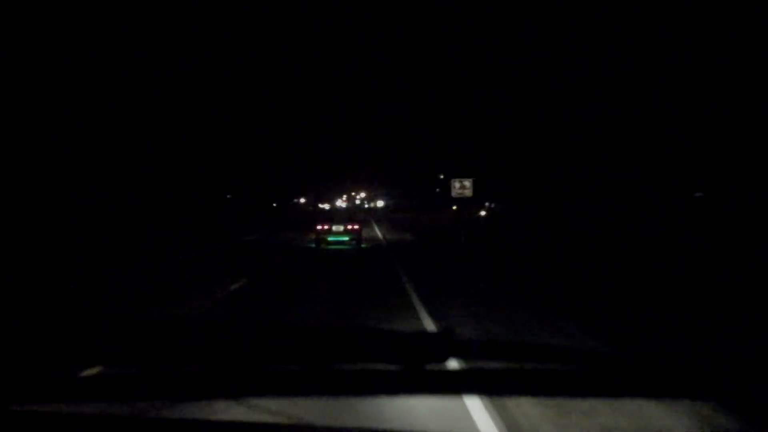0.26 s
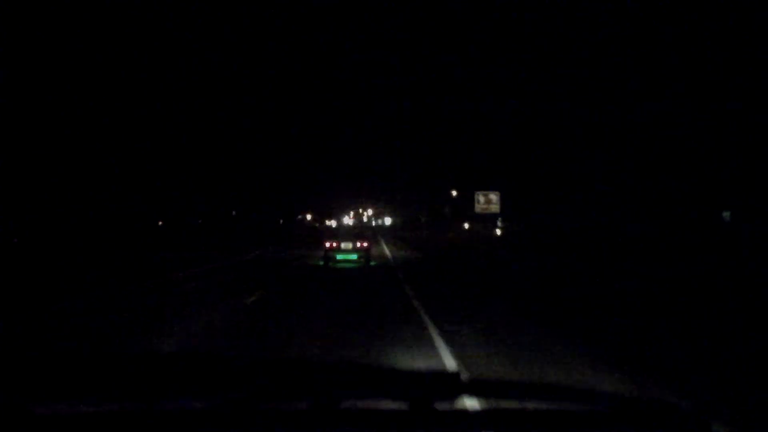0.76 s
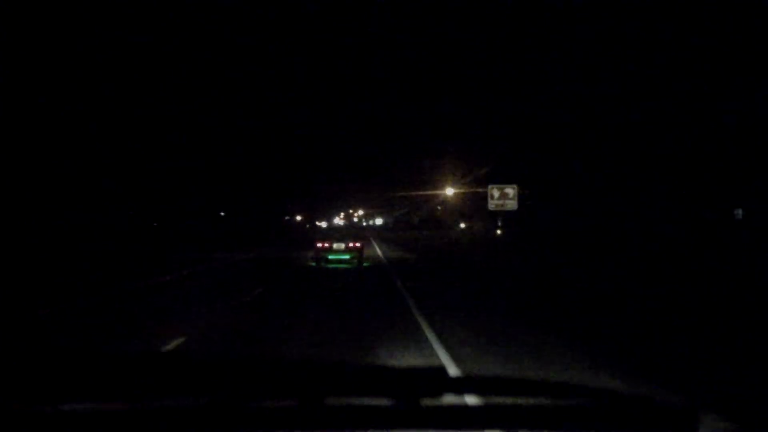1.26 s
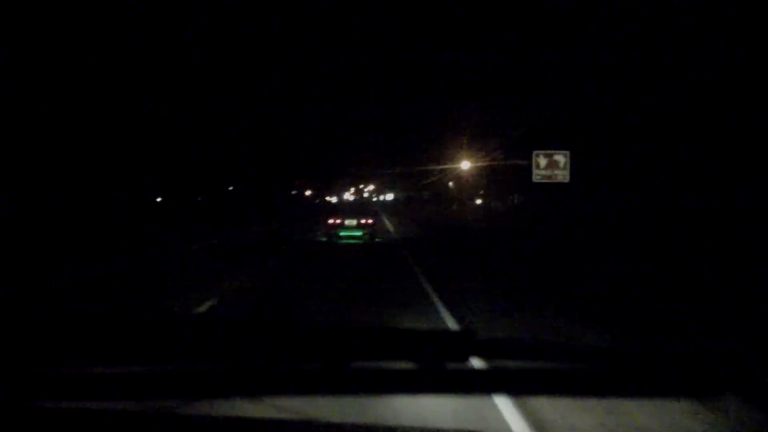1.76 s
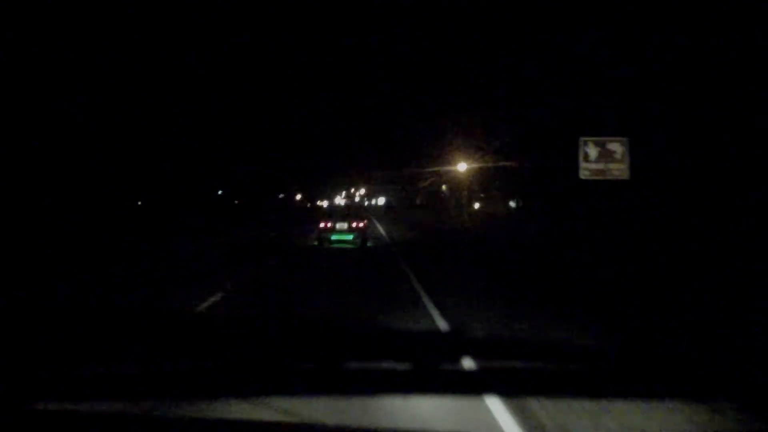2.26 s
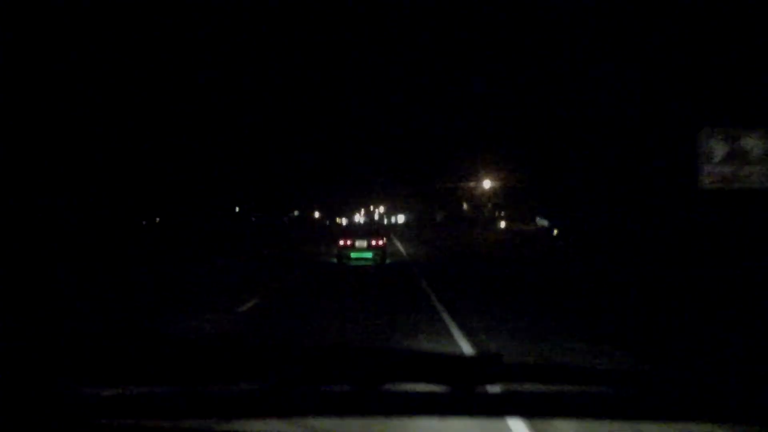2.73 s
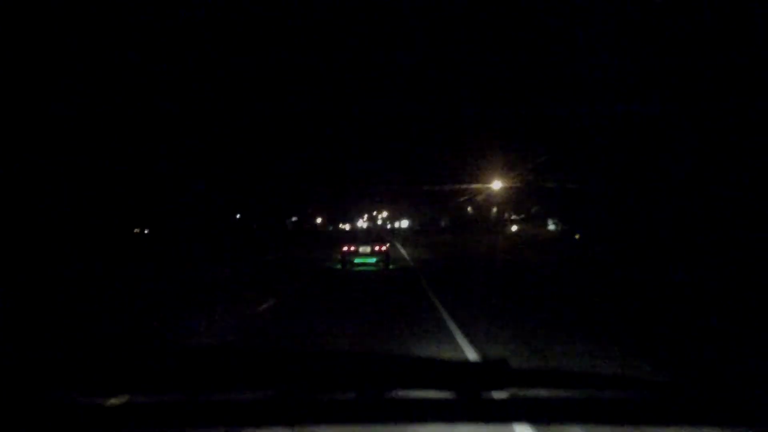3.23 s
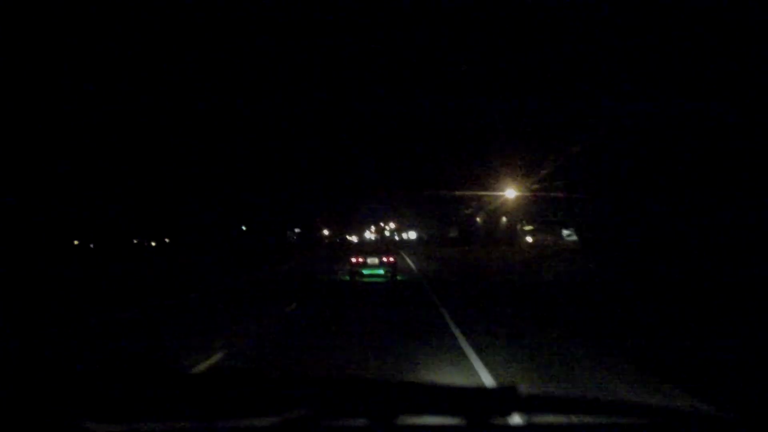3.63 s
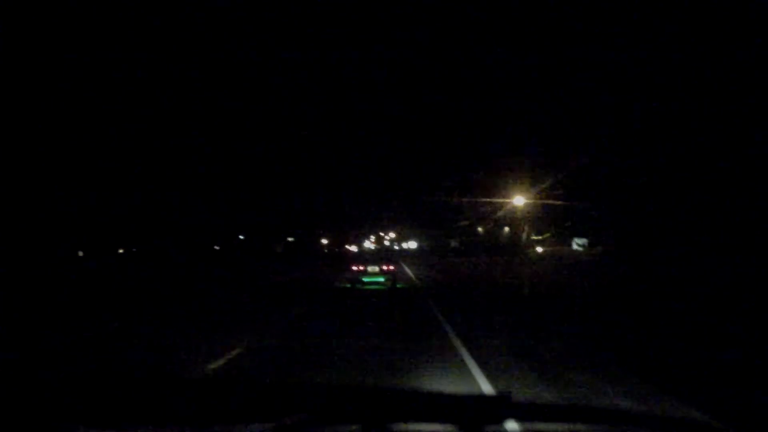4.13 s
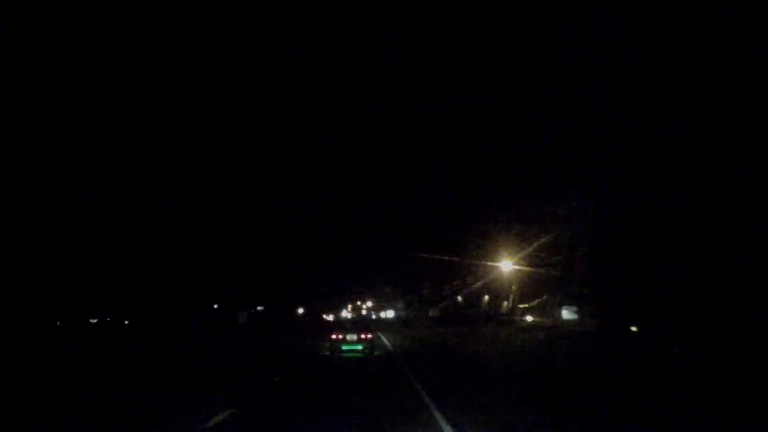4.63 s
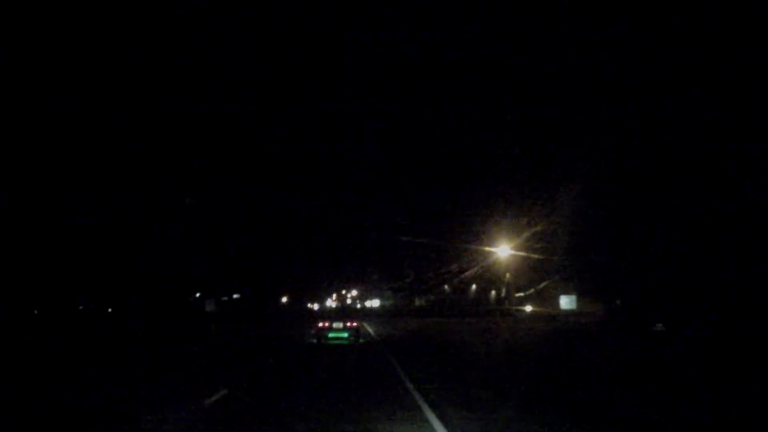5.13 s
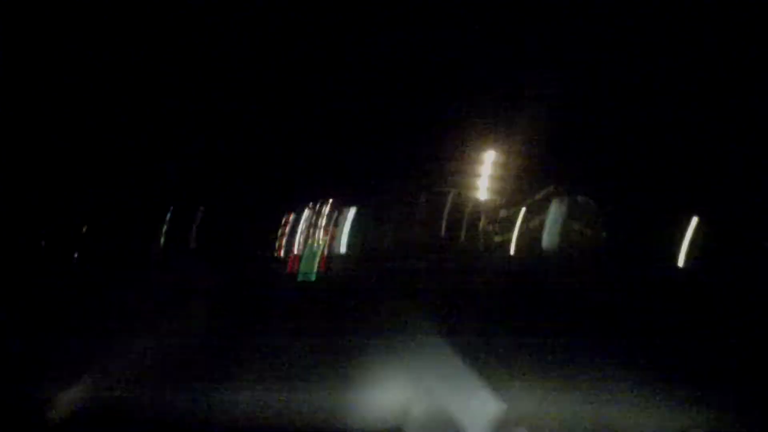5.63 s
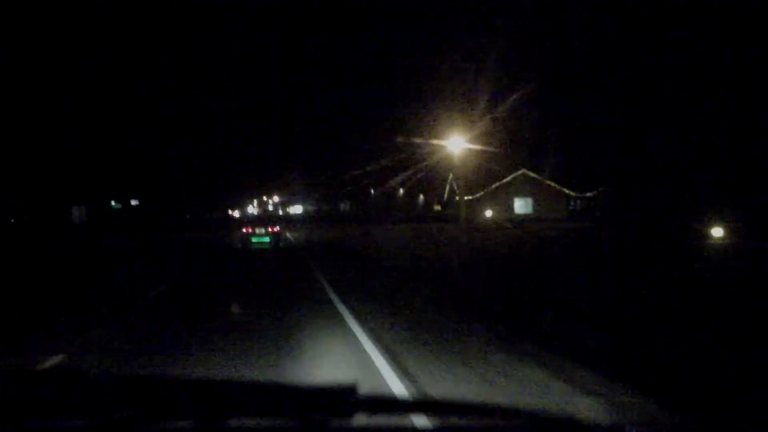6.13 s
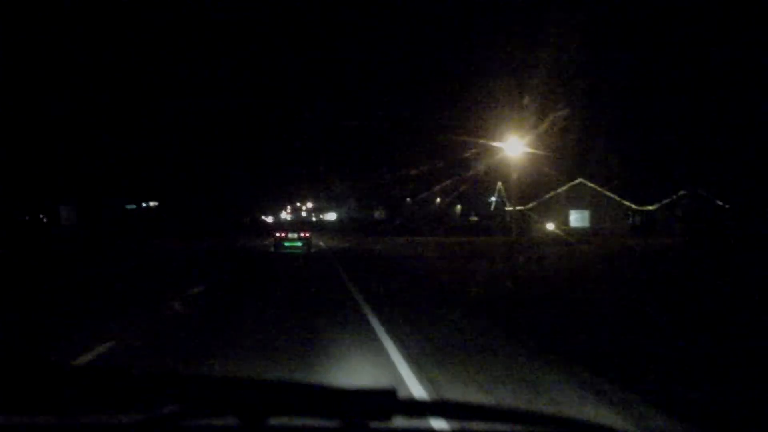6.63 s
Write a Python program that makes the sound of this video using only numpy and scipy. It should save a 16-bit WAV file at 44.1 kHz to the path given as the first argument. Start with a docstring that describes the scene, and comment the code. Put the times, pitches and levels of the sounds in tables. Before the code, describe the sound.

Car cabin interior: lumpy engine hum booms over tyre rumble, rises, lurches with a heavy thud, then growls hard and steady under acceleration.

```python
"""An engine with an uneven firing pattern, heard inside a car, coasts, holds and pulls, booming in the cabin.
Its tone is a sum of orders (multiples of the pattern rate); after a jolt it pulls hard with a coarser, louder
beat under a wide, throbbing roar. The jolt is a set of decaying sines, with a thin sine squeak soon after.
Loose trim ticks as enveloped noise; tyre roar and body rumble are shaped noise.
Two close microphone ports overload softly."""
import sys
import numpy as np
from scipy import signal
from scipy.fft import rfft, irfft, next_fast_len
from scipy.io import wavfile
from scipy.ndimage import uniform_filter1d

SR = 44100
rng = np.random.default_rng(int(sys.argv[2]) if len(sys.argv) > 2 else 0)


def generate_wav(sig):
    """Save sig (samples, or channels by samples) to the path in sys.argv[1] as 16-bit PCM at SR."""
    pcm = np.round(np.clip(np.atleast_2d(sig).T, -1, 1) * 32767).astype(np.int16)
    wavfile.write(sys.argv[1], SR, pcm)


N = 303849
T = np.arange(N) / SR
LEFT_LAG_S = 2.0e-5  # extra travel time to the left port


def amp(db):
    """Decibel law: 20 dB is a factor of ten in amplitude."""
    return 10 ** (np.asarray(db) / 20)


def evened(x):
    """Normalisation to unit rms."""
    return x / np.sqrt(np.mean(x ** 2) + 1e-20)


def read_spectrum(points, hz):
    """Interpolation of a spectrum along a logarithmic frequency axis."""
    f, value = np.transpose(points)
    return np.interp(np.log(hz + 1), np.log(f + 1), value)


def columns(rows, t):
    """Linear interpolation of each column of a curve table at times t."""
    s, *values = np.transpose(rows)
    return [np.interp(t, s, v) for v in values]


def wander(t, hz):
    """Low-passed chance: noise through a one-pole filter with decay rate 2 pi hz, about rms 1."""
    knot_rate = 200  # Hz
    knots = np.arange(0, t[-1] - t[0] + 1, 1 / knot_rate)
    pole = np.exp(-2 * np.pi * hz / knot_rate)
    smooth = signal.lfilter([1], [1, -pole], rng.standard_normal(len(knots)))
    return np.interp(t - t[0], knots, evened(smooth))


def order(t, turns, k, db, rough, spread=1.0):
    """Harmonic of a rotating source: k periods per turn, with wavering strength and phase."""
    shake = rough * (wander(t, hz=6.0) + 1j * wander(t, hz=6.0))
    # starting phase drawn within spread (in periods); a small spread gives sharper pulses
    phase = 2 * np.pi * (k * turns + spread * rng.random())
    return -np.sqrt(2) * amp(db) * ((1 + shake) * np.exp(1j * phase)).real


# coherence of diffuse sound at the two ports: pitch_hz [Hz], likeness [0-1]
PORT_LIKENESS = [(60, 1), (1340, 1), (2900, 1), (6310, 0.87), (13700, 0.26)]


def hiss(shape, size, patchy_db, bands=()):
    """Diffuse noise: random short-time spectra with drifting patches, rms 1, alike at both ports in the bass."""
    frames, hz = 4 * N // size + 5, np.fft.rfftfreq(size, 1 / SR)
    a, b, c, d, patches = rng.standard_normal((frames, len(hz), 5)).T
    across_hz = uniform_filter1d(patches, size=9, axis=0)
    patches = evened(uniform_filter1d(across_hz, size=7, axis=1))
    bands_db = sum(db / (1 + (2 * (hz - f) / w) ** 2) for f, w, db in bands)
    colour_db = read_spectrum(shape, hz) + bands_db
    same = np.clip(read_spectrum(PORT_LIKENESS, hz), 0, 1)[:, None]
    lag = np.exp(-2j * np.pi * hz * LEFT_LAG_S)[:, None]
    right = a + 1j * b
    left = same * right * lag + np.sqrt(1 - same ** 2) * (c + 1j * d)
    spectra = np.array([left, right]) * amp(colour_db[:, None] + patchy_db * patches)
    return evened(signal.istft(spectra, nperseg=size, noverlap=3 * size // 4)[1][:, :N])


# engine speed before the jolt: start_s [s], pattern_hz [firing pattern repeats, Hz]
PATTERN_SPEED = [(0, 12.7), (1.8, 12.48), (2, 12.64), (2.1, 12.96), (2.45, 13.55), (2.6, 13.93),
                 (2.75, 14.1), (3, 14.22), (4.15, 14.34), (4.3, 14.44), (4.6, 15.15), (4.9, 16.24),
                 (5.2, 16.97), (5.4, 17.8), (5.6, 18.4)]
# order strengths in the cabin: order [multiple], coast_db, hold_db, climb_db, pull_db [dB]
PATTERN_ORDERS = [(1, -51, -36, -29, -47), (2, -30, -30, -35, -39), (3, -31, -23, -24, -21),
                  (4, -38, -37, -40, -30), (5, -35, -31, -30, -24), (6, -44, -25, -22, -18),
                  (7, -29, -25, -28, -29), (8, -24, -11, -16, -32), (9, -35, -33, -33, -27),
                  (10, -62, -44, -40, -44), (11, -60, -34, -33, -57), (12, -51, -39, -56, -52),
                  (13, -58, -44, -43, -44), (14, -52, -42, -42, -36), (15, -44, -34, -58, -42),
                  (16, -66, -39, -41, -37), (17, -63, -60, -49, -35), (18, -52, -44, -39, -34),
                  (19, -62, -35, -31, -36), (20, -62, -43, -61, -45), (21, -59, -44, -48, -45),
                  (22, -65, -49, -54, -50), (23, -53, -56, -54, -63), (24, -49, -49, -50, -59),
                  (25, -71, -56, -67, -81), (26, -61, -62, -65, -55), (35, -70, -75, -54, -51),
                  (36, -76, -70, -58, -55), (37, -80, -61, -59, -45), (41, -59, -53, -52, -66),
                  (42, -74, -50, -56, -60), (47, -69, -53, -67, -64)]
# cabin response to orders 6 and 8 as they slide through its boom: pitch_hz [Hz], level_db [dB]
CABIN_BOOM = [(75, -40.5), (80, -28.5), (85, -27.5), (94, -18.5), (100, -18), (107, -12), (111.5, -9),
              (115, -11), (119, -16), (125, -19), (130, -26), (133, -42), (139, -25), (147, -19.5)]
# pattern rates that mark the throttle states; the pull strengths hold at PULL_HZ
COAST_HZ, HOLD_HZ, LEAVE_HZ, CLIMB_HZ, PULL_HZ = 12.65, 13.76, 14.42, 15.06, 16.78
COAST_DB = -6  # the boom is weaker off the throttle
LIFT_DB, PUSH_DB, PUSH_HZ = 0.5, 5.5, (17.1, 17.8)  # the other orders, and their gain over the last revs


def drive():
    """Order synthesis: multiples of the firing pattern, rebalanced by the throttle and coloured by the cabin."""
    step = 8  # all of it lies low, so every eighth sample is enough
    t = T[T < PATTERN_SPEED[-1][0]][::step]
    (hz,) = columns(PATTERN_SPEED, t)
    turns = np.cumsum(hz) * step / SR
    # throttle states: 0 coast, 1 hold, 2 climb, 3 pull
    throttle = np.interp(hz, [COAST_HZ, HOLD_HZ, LEAVE_HZ, CLIMB_HZ, PULL_HZ], [0, 1, 1, 2, 3])
    lift_db = LIFT_DB + PUSH_DB * np.interp(hz, PUSH_HZ, [0, 1])
    table = np.transpose(PATTERN_ORDERS)
    out = 0
    for k, coast, hold, climb, _ in PATTERN_ORDERS:
        if k in (6, 8):
            level_db = read_spectrum(CABIN_BOOM, k * hz) + COAST_DB * np.maximum(1 - throttle, 0)
        else:
            # above PULL_HZ the orders slide through the cabin's response
            pull = np.interp(k * np.maximum(hz / PULL_HZ, 1), table[0], table[-1])
            eased = np.interp(throttle, [0, 1, 2, 3], [coast, hold, climb, 0])
            level_db = lift_db + eased + pull * np.clip(throttle - 2, 0, 1)
        out = out + order(t, turns, k, level_db, rough=0.11)
    fade = np.clip((t[-1] - t) / 0.036, 0, 1)
    out = signal.resample_poly(out * fade, step, 1)
    return np.pad(out, (0, N - len(out)))


# engine after the jolt: start_s [s], beat_hz [Hz], level_db [dB, all orders together], strain [0-1]
HARD_PULL = [(5.6, 25, -7, 0.01), (5.63, 26.73, -11, 0.16), (5.665, 28.94, -11.5, 0.04),
             (5.714, 32.23, -7.5, 0.8), (5.8, 34.16, -4, 0.57), (5.84, 35.06, -5, 0.5),
             (5.876, 34.68, -9.5, 0.45), (5.98, 33.28, -8, 0.68), (6.05, 33.28, -8, 0.66),
             (6.174, 33.95, -8.5, 0.17), (6.89, 35.19, -7.5, 0)]
# relative order strengths in the cabin: order [multiple], early_db, late_db [dB]
BEAT_ORDERS = [(1, -26, -25), (2, -16, -18), (3, -11, -10), (4, -23, -21), (5, -22, -27), (6, -27, -29),
               (7, -29, -29), (8, -22, -24), (9, -20, -22), (10, -45, -38), (11, -43, -39), (12, -35, -32),
               (13, -36, -37), (14, -38, -32), (15, -45, -36), (16, -39, -30), (17, -38, -33),
               (18, -34, -34), (19, -35, -32), (20, -39, -40), (21, -48, -53), (22, -58, -46),
               (23, -45, -44), (24, -48, -51), (25, -37, -35), (26, -47, -41), (27, -47, -48),
               (28, -63, -52), (29, -38, -38), (30, -45, -41), (31, -40, -59), (32, -43, -50),
               (33, -49, -66), (34, -54, -53), (35, -50, -40), (36, -47, -64), (37, -50, -44),
               (38, -41, -50), (39, -42, -53), (40, -53, -44), (41, -54, -58), (42, -52, -46),
               (43, -44, -47), (44, -45, -50), (45, -55, -58), (46, -62, -59)]
FULL_BEAT_HZ = 33.2  # at and above this beat the orders stop sliding through the table
RASP_DB, HOLLOW_DB = 22, -6.5  # strain lifts orders 10-11 and thins orders 8-9
BITE_S, BITE_DB, BITE_TILT_DB = 0.088, 13, 0.5  # first instants: strong orders 8-9, brighter (dB per octave)
HEAVE_DB = 7  # orders 1-2 swell until the driveline settles


def surge():
    """Order synthesis under load: strain and a loose driveline redistribute the beat; returns sound and turns."""
    t = T[T >= HARD_PULL[0][0]]
    hz, level_db, strain = columns(HARD_PULL, t)
    turns = np.cumsum(hz) / SR
    ks, early_db, late_db = np.transpose(BEAT_ORDERS)
    later = np.clip((t - 6.3) / 0.5, 0, 1)
    slide = np.minimum(hz / FULL_BEAT_HZ, 1)  # orders slide through the cabin's response at low revs
    bite = np.exp(-((t - t[0]) / BITE_S) ** 2)
    loose = np.interp(t, [5.75, 5.95], [1, 0])  # ragged until the driveline settles
    low_db = HEAVE_DB * loose * (1 - bite)
    boom_db = BITE_DB * bite + HOLLOW_DB * strain
    rasp_db = RASP_DB * strain
    dbs = []
    for k, late in zip(ks, late_db):
        cabin_db = np.interp(k * slide, ks, early_db) * (1 - later) + late * later
        tilt_db = BITE_TILT_DB * bite * np.log2(min(k, 12) / 3)
        dbs.append(cabin_db + tilt_db + low_db * (k < 3) + boom_db * (k in (8, 9))
                   + rasp_db * (k in (10, 11)))
    rough = .07 + .3 * loose
    beat = 0
    for k, db in zip(ks, dbs):
        # timing errors weigh more on the high orders
        beat = beat + order(t, turns, k, db, rough * (1 + k / 40), spread=min(k / 12, 1))
    total = np.sqrt(np.sum(amp(dbs) ** 2, axis=0))
    beat *= amp(level_db) / total * np.clip((t - t[0]) / 0.025, 0, 1)
    return np.pad(beat, (N - len(t), 0)), np.pad(turns, (N - len(t), 0))


# roar colour: pitch_hz [Hz], density_db [relative dB per Hz]
ROAR_COLOUR = [(120, -31), (200, -13), (330, -15), (650, -12.5), (900, -20), (1300, -17), (1800, -21.5),
               (2940, -26), (5000, -33.5), (6900, -38), (9100, -40), (11500, -44.5), (13000, -51.5),
               (14500, -75)]
# roar strength before wander and throb: start_s [s], level_db [dB]
ROAR_LEVEL = [(0, -47.5), (2, -47.5), (2.8, -46.2), (4.3, -46), (4.6, -44), (5.0, -41.5), (5.39, -38.5),
              (5.68, -31), (5.87, -26), (6.1, -25.5), (6.89, -25.5)]


def engine_roar(turns):
    """Amplitude modulation: broadband noise that throbs once per beat during the hard pull."""
    (level_db,) = columns(ROAR_LEVEL, T)
    throb = 1 + .22 * np.cos(2 * np.pi * turns)
    gain = amp(level_db + 0.5 * wander(T, hz=14.0)) * throb
    return gain * hiss(ROAR_COLOUR, size=1024, patchy_db=0.8)


# swings of body and panel: start_s [s], level_db [dB, before the rise], pitch_hz [Hz], t60_s [s]
JOLT_MODES = [(5.549, 10, 28, .3), (5.62, -6, 605, .12), (5.66, -8, 33, .8)]
RISE_S = .03  # the body takes a moment to swing


def jolt():
    """Damped resonance: the body heaves and a panel rings as the driveline takes up."""
    out = np.zeros(N)
    for s, db, hz, t60 in JOLT_MODES:
        after = np.maximum(T - s, 0)
        envelope = amp(db - 60 * after / t60) * (1 - np.exp(-after / RISE_S))
        out -= envelope * np.sin(2 * np.pi * hz * after)
    return out


# thin squeak: start_s [s], end_s [s], pitch_hz [Hz], level_db [peak dB]
SQUEAK_TONE = (6.145, 6.225, 8450, -44)


def squeak():
    """Pure tone: a thin squeak under a half-sine envelope, just after the loudest tick."""
    start, end, hz, db = SQUEAK_TONE
    swell = np.sin(np.pi * np.clip((T - start) / (end - start), 0, 1))
    return amp(db) * swell * np.sin(2 * np.pi * hz * T)


# trim ticks: start_s [s], level_db [dB, before the attack], dull_db [dB relative to level_db]
TRIM_TICKS = [(0.2984, -51, 1), (2.0657, -49, -8), (2.4394, -48.5, 2), (2.759, -49, 4), (3.6406, -48, -21),
              (4.1624, -51, -9), (4.5054, -47, 2), (4.7112, -46, 1), (5.1828, -29.5, -3), (5.7144, -34, -8),
              (5.7882, -34, -9), (6.1212, -12.5, -7)]
# bright rattle colour: pitch_hz [Hz], density_db [relative dB per Hz]
RATTLE_COLOUR = [(1000, -34), (2000, -8.5), (3500, -2), (5000, -1.5), (9500, -8.5), (13000, -15.5),
                 (15500, -35.5)]
# dull knock colour: pitch_hz [Hz], density_db [relative dB per Hz]
KNOCK_COLOUR = [(400, -32.5), (690, 9), (820, -1.5), (960, 1.5), (1150, -11.5), (1400, -3), (2200, -19),
                (4000, -25.5), (9000, -70.5)]
TICK_T60_S = 0.061


def ticks():
    """Impact noise: loose trim gives a short bright rattle, with a duller knock just behind it."""
    bright, dull = np.zeros((2, N))
    for s, db, dull_db in TRIM_TICKS:
        after = np.maximum(T - s, 0)
        bright += amp(db - 60 * after / TICK_T60_S) * (1 - np.exp(-after / .0012))
        late = after / .009  # the knock peaks 9 ms after the start
        dull += amp(db + dull_db) * late * np.exp(1 - late)
    rattle = bright * hiss(RATTLE_COLOUR, size=512, patchy_db=0.5)
    knock = dull * hiss(KNOCK_COLOUR, size=1024, patchy_db=0.0)
    return rattle + knock


# tyre roar colour: pitch_hz [Hz], density_db [relative dB per Hz]
TYRE_COLOUR = [(70, -31.5), (120, -17.5), (140, -14.5), (190, -6), (256, -20), (300, -13.5), (350, -19.5),
               (515, -20), (720, -22), (1340, -26), (1650, -39), (3000, -59), (6000, -67.5), (14000, -94.5)]
# narrow bands coloured by the panels: pitch_hz [Hz], width_hz [Hz], change_db [dB]
PANEL_BANDS = [(556, 130, 2.5), (724, 120, 4), (866, 120, 0.5), (974, 34, 6.5), (1415, 15, -7.5),
               (1600, 14, 0.5)]
# tyre roar strength: start_s [s], level_db [dB]
TYRE_LEVEL = [(0, -37.5), (1.5, -38.5), (4.3, -37), (5.0, -34.5), (5.4, -32), (5.65, -28), (5.85, -31),
              (6.0, -36), (6.89, -36)]


def tyre_roar():
    """Spectral colouring: broadband tyre noise raised or lowered in narrow bands by the panels."""
    (level_db,) = columns(TYRE_LEVEL, T)
    return amp(level_db) * hiss(TYRE_COLOUR, size=2048, patchy_db=1.3, bands=PANEL_BANDS)


# body rumble colour: pitch_hz [Hz], density_db [relative dB per Hz]
RUMBLE_COLOUR = [(4, -9.5), (10, 3), (20, -1), (29, 0.5), (40, 3.5), (55, -13.5), (75, -10.5), (120, -17),
                 (200, -19.5), (350, -44.5), (700, -92)]
# body rumble strength before the uneven shaking: start_s [s], level_db [dB]
RUMBLE_LEVEL = [(0.0, -17.5), (0.55, -18.5), (1.35, -24), (1.9, -19.5), (2.45, -20), (4.25, -23),
                (4.7, -18.5), (5.45, -24), (5.66, -17), (5.8, -14), (6.35, -16), (6.89, -19)]
LUMPY_DB = 2.5  # the road shakes the body unevenly


def body_rumble():
    """Random excitation: low noise whose level wanders as the road shakes the body."""
    (level_db,) = columns(RUMBLE_LEVEL, T)
    gain = amp(level_db + LUMPY_DB * wander(T, hz=7.4))
    return gain * hiss(RUMBLE_COLOUR, size=8192, patchy_db=0.7)


def ports(x):
    """Arrival-time difference: a sound from one place reaches the right port slightly first."""
    size = next_fast_len(N)
    lag = np.exp(-2j * np.pi * np.fft.rfftfreq(size, 1 / SR) * LEFT_LAG_S)
    left = irfft(rfft(x, size) * lag, size)[:N]
    return np.array([left, x])


def scene():
    """Superposition: engine tone, jolt and squeak from one place, noise from all around."""
    beat, turns = surge()
    one_place = ports(drive() + beat + jolt() + squeak())
    return one_place + engine_roar(turns) + ticks() + tyre_roar() + body_rumble()


# narrow steady dips in the treble: pitch_hz [Hz], width_hz [Hz], change_db [dB]
TREBLE_DIPS = [(7880, 150, -18), (11150, 50, -9)]
EDGE_HZ = 15000  # band limit


def record(dry):
    """Treble shaping: narrow dips; then saturation with a firm knee and a low-pass band limit."""
    size = next_fast_len(N)
    hz = np.fft.rfftfreq(size, 1 / SR)
    dips_db = sum(db * np.exp(-((hz - f) / w) ** 2) for f, w, db in TREBLE_DIPS)
    shaped = irfft(rfft(dry, size) * amp(dips_db), size)[:, :N]
    clipped = shaped / (1 + np.abs(shaped) ** 8) ** (1 / 8)
    low_pass = signal.firwin(255, EDGE_HZ, window=("kaiser", 9), fs=SR)
    return signal.oaconvolve(clipped, low_pass[None], "same")


dry = scene()
out = record(dry)
generate_wav(out)
```